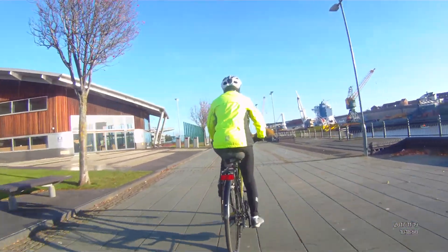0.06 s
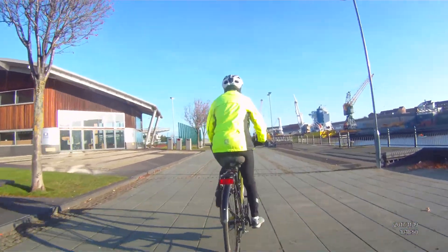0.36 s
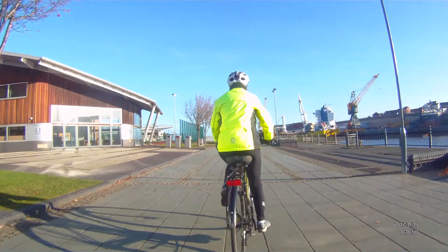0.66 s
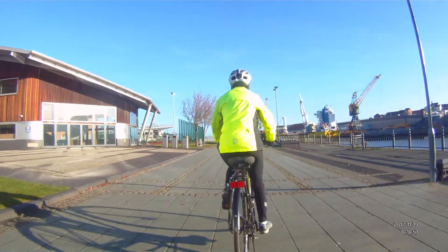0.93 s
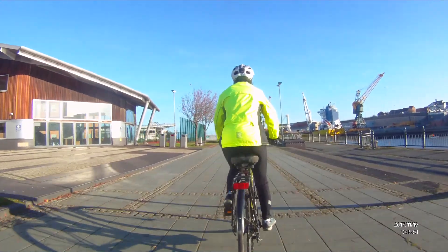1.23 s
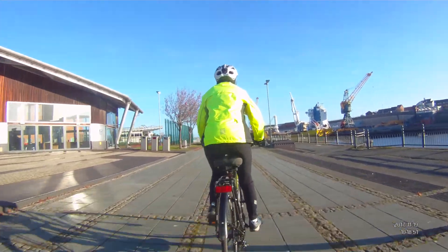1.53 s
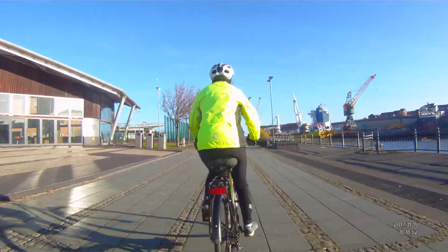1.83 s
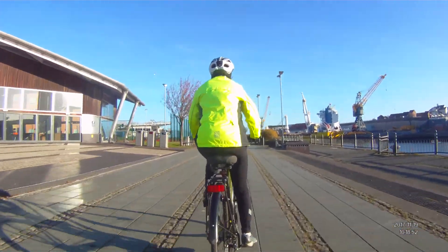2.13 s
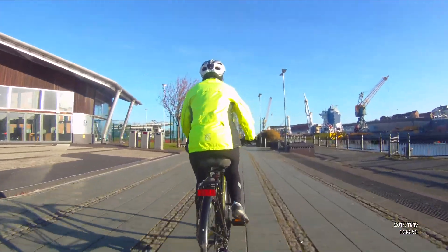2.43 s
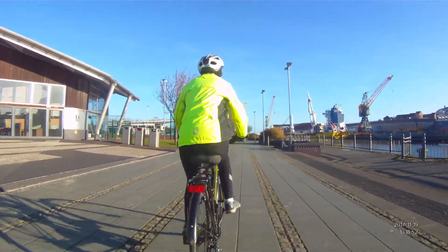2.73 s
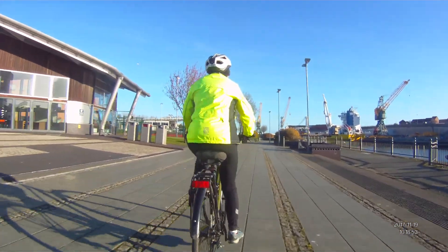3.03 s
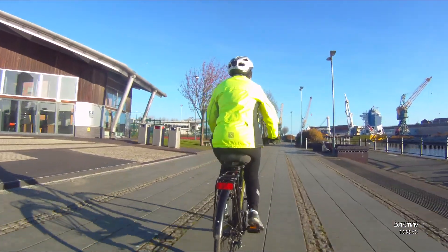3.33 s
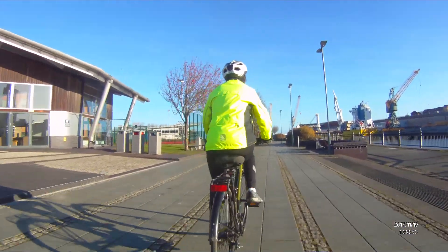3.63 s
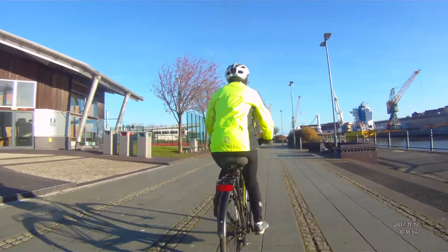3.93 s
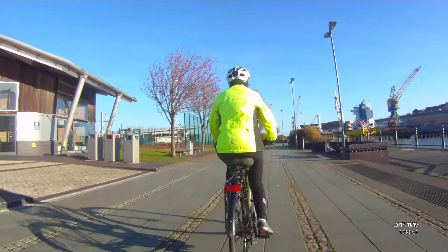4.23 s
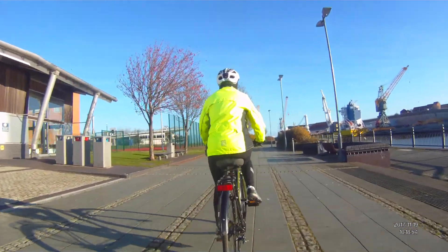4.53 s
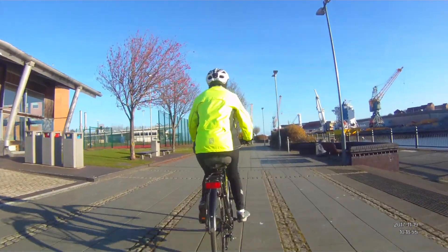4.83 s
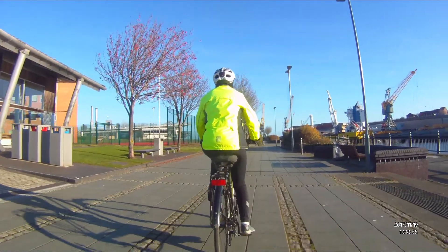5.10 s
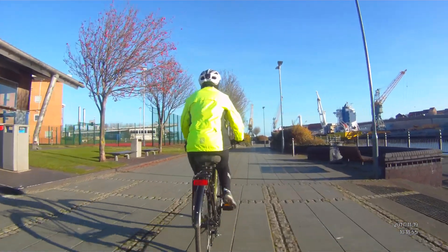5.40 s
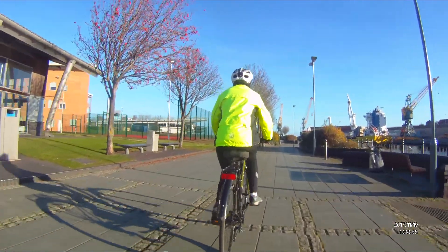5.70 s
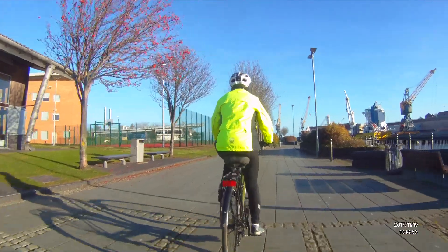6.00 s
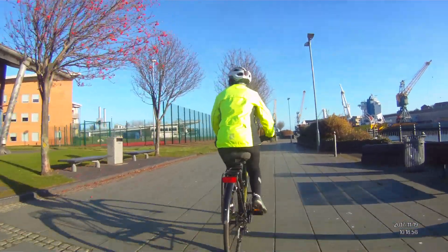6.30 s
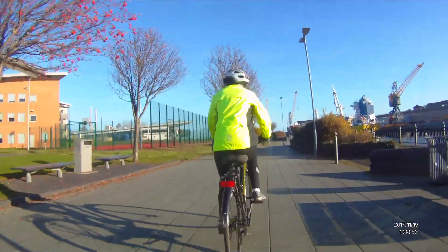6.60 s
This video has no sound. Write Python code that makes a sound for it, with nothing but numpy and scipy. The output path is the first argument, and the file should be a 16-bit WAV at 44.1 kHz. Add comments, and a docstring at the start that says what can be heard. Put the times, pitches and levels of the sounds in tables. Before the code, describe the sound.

Steady plastic rattling and small clicks from a bicycle rolling over paving, twice breaking into hard, loud clatter as it crosses cobbles.

```python
"""A camera mount chatters and knocks on a bicycle riding over paving slabs and two strips of cobbles.
The road shakes the mount, and every contact makes the camera's small plastic housing ring.
Underneath, the frame rumbles and the tyres drone; loose metal parts tinkle and the circuits faintly
hiss and whine. The hardest jolts overload the microphone."""
import sys
import numpy as np
from scipy import signal
from scipy.fft import rfft, irfft
from scipy.io import wavfile

SR = 44100
rng = np.random.default_rng(int(sys.argv[2]) if len(sys.argv) > 2 else 0)


def inscribe(sig):
    """Save sig as 16-bit PCM at rate SR to the path in sys.argv[1].

    A 1-D sig is mono; a 2-D sig holds one channel per row.
    Samples are clipped to [-1, 1] before scaling.
    """
    pcm = np.round(np.clip(np.atleast_2d(sig).T, -1, 1) * 32767)
    wavfile.write(sys.argv[1], SR, pcm.astype(np.int16))


N = 297715
TIME = np.arange(N) / SR
TAPS = 4096  # filter length in samples
FREQ = np.arange(TAPS // 2 + 1) * SR / TAPS + 1e-3

# the notes at which the plastic housing rings: (pitch [Hz], width [Hz], relative level [dB])
HOUSING_MODES = [(412, 112, -13.5), (710, 330, -16), (1230, 550, -10), (1561.6, 132, 1.5), (1890, 870, -9),
                 (2070, 256, -6), (2490, 213, -7), (2730, 1100, -15.5), (3420, 353, -9.5),
                 (3660, 120, -28.5), (4800, 410, -30.5)]


def mount_chatter(shake_db, ticks_per_s=75):
    """Tyre grain keeps six loose points of the mount ticking; stronger shake makes them brighter."""
    mode_db = np.array(HOUSING_MODES)[:, 2]
    flutter = undb(2.5 * wander(70))
    body = 0
    for _ in range(6):
        touches = rng.random(N) < ticks_per_s / SR
        strength = undb(1.5 * np.clip(rng.standard_normal(N), -2, 2))
        direction = np.sign(rng.standard_normal(N))
        ticks = unit(touches * direction * strength)
        contacts = (ticks + rng.standard_normal(N)) * flutter
        weights = undb(4 * rng.random(len(HOUSING_MODES)) - 12)
        weights *= undb(3 * (mode_db == mode_db.max()))  # steady rubbing feeds the strongest note most
        body = body + disperse(ring(contacts, housing(weights)), spread_s=.002)
    body = unit(body)
    treble = signal.sosfiltfilt(signal.butter(2, 2600, "high", fs=SR, output="sos"), body)
    hardness_db = .22 * (shake_db - np.median(shake_db)) - 8.3
    return (body + (undb(hardness_db) - 1) * treble) * undb(shake_db + 1.35)


def mount_knocks(force_db, bounce_s=.0115, bounce_loss_db=11):
    """Joints and stones knock the mount, which bounces once; rough ground adds force and cuts thud."""
    # the big knocks: (time [s], relative peak [dB], relative treble [dB], relative thud [dB])
    jolts = [(0.213, -14.5, -27, -25), (0.223, -10.5, -27, -36), (0.359, -10.5, -31, -26),
             (0.378, -12.5, -39, -31), (0.458, -10, -26.5, -24), (0.54, -9.5, -35.5, -25),
             (0.708, -16.5, -48, -17), (0.962, -19.5, -42, -20), (1.052, -6, -18, -27),
             (1.086, -16, -36.5, -36), (1.13, -8.5, -30, -36), (1.552, -9.5, -34.5, -25),
             (1.64, -13, -31, -33), (1.831, -8, -21, -23), (1.926, -8, -33, -35), (2.052, -16, -35, -31),
             (2.122, -8.5, -17, -19), (2.158, -3, -23, -22), (2.176, -1.5, -26, -26),
             (2.187, -3, -30, -23.5), (2.201, -2.5, -22.5, -23), (2.258, -11, -14, -36),
             (2.358, -8.5, -23, -23), (2.38, -3, -27, -25), (2.4, -7, -23, -17), (2.413, 1.5, -11, -30),
             (2.431, 3.5, -13, -28), (2.44, 7, -16, -22), (2.466, 1.5, -11, -18), (2.483, 0.5, -27, -24),
             (2.488, 2, -17, -23), (2.503, -4.5, -36, -26), (2.646, -5, -21.5, -33), (2.666, 1, -15, -15.5),
             (2.688, 6, -13, -28), (2.735, -10, -35, -38), (3.097, -18.5, -20.5, -22),
             (3.373, -12.5, -30, -31), (3.453, -11.5, -30, -24.5), (3.734, -12, -26, -38),
             (3.812, -13.5, -25, -29), (3.898, -16.5, -39, -31), (3.972, -10.5, -44, -21.5),
             (4.095, -15.5, -38, -32), (4.259, -20, -32, -16), (4.443, -18.5, -21, -23),
             (4.632, -18, -28, -25), (4.711, -13, -25, -26), (4.977, -14.5, -28.5, -23),
             (5.238, -16.5, -33, -19), (5.59, -17.5, -29, -17), (5.672, -16, -28, -31),
             (5.699, -15.5, -29, -33), (5.759, -18.5, -29, -21), (5.849, -10, -20, -34),
             (6.018, -11.5, -25, -22.5), (6.452, -10, -31, -25), (6.473, -5, -14, -40),
             (6.487, -6, -15, -20.5), (6.505, 3.5, -21.5, -27), (6.532, -2, -28.5, -24),
             (6.585, -8.5, -25, -26), (6.707, -4.5, -16, -20), (6.726, 0, -17, -20.5), (6.733, 2, -13, -27),
             (6.744, 3, -14, -24)]
    out = np.zeros(N)
    for s, peak_db, treble_db, low_db in jolts:
        extra_db = np.interp(s, TIME, force_db)
        level_db = peak_db + .5 + extra_db
        hardness_db = min(treble_db + 23.5 + extra_db / 2, 8)
        thud_db = low_db + 24 - extra_db
        add(out, s, knock(level_db, hardness_db, thud_db))
        lands_s = s + bounce_s * (1 + .1577 * either_way())
        add(out, lands_s, knock(level_db - bounce_loss_db, hardness_db, thud_db))
    return out


def mount_rattle(shake_db, rough_db, force_db, slab_per_s=8, cobble_per_s=85):
    """Smaller knocks come at random; stronger shake makes them more frequent, louder and harder."""
    out = np.zeros(N)
    per_s = slab_per_s + (cobble_per_s - slab_per_s) * rough_db / rough_db.max()
    count_so_far = np.cumsum(per_s) / SR
    for k in range(int(count_so_far[-1])):
        i = np.searchsorted(count_so_far, k + rng.random())
        level_db = shake_db[i] + 12 + force_db[i] + 5.5 * either_way()
        add(out, TIME[i], knock(level_db, hardness_db=-4 + .44 * rough_db[i], thud_db=-5))
    return out


def knock(level_db, hardness_db, thud_db, rise_s=.0009, buzz_s=.0062, firm_db=-14):
    """A jolt slaps the mount onto its stop and lets it buzz to rest in quick rebounds."""
    t = np.arange(TAPS) / SR
    # weak knocks do not seat the mount firmly, so it buzzes for longer
    length_s = buzz_s + .0003 * max(firm_db - level_db, 0)
    length_s *= np.exp(.34 * either_way())
    buzz = np.minimum(t / rise_s, 1) * np.exp(-(t / length_s) ** 1.5)
    push = .25 * rng.standard_normal(TAPS) * (rng.random(TAPS) < .15) * buzz
    push[int(rise_s * SR)] += 1  # the slap itself
    # each contact point favours different notes of the housing
    gain = housing(undb(2 * rng.standard_normal(len(HOUSING_MODES))))
    treble = 1 / (1 + (2600 / FREQ) ** 8) / (1 + (FREQ / 4500) ** 8)
    bass = 1 / (1 + (FREQ / 950) ** 6)
    hit = ring(disperse(push, spread_s=.0013), gain * undb(hardness_db * treble + thud_db * bass))
    attack_level = np.sqrt(np.mean(hit[:int(.008 * SR)] ** 2))
    return hit * undb(level_db - 11) / attack_level


def housing(weights):
    """How strongly the housing rings at each frequency; the plastic soaks up the highest treble."""
    # the tone of soft plastic contacts: (frequency [Hz], gain [dB])
    contact_tone = [(30, -23.5), (120, -2.5), (400, 0), (900, -1.5), (1500, 3), (2500, -0.5), (3100, -7),
                    (4000, -11.5), (4800, -19), (5500, -34.5), (8000, -15.5), (16000, -31.5)]
    return resonances(HOUSING_MODES, weights) * colour(contact_tone) / np.hypot(1, (FREQ / 5800) ** 4)


def disperse(x, spread_s):
    """Bending waves reach the microphone at different times for each frequency, softening each hit."""
    delay_s = spread_s * np.interp(FREQ / FREQ[-1], np.linspace(0, 1, 64), rng.random(64))
    smear = irfft(np.exp(-2j * np.pi * np.cumsum(delay_s) * SR / TAPS))
    lead = TAPS // 64
    return signal.oaconvolve(x, np.roll(smear, lead)[:TAPS // 2])[lead:lead + len(x)]


def road_shake(climb_s=.02, settle_s=.032):
    """How hard the road shakes the mount, in dB: the grain of the slabs plus swells on the cobbles."""
    # slab grain, one list before and one after the first cobbles: (time [s], shake [dB])
    slabs = [
        [(0.0, -35), (0.384, -32), (0.68, -36), (1.134, -34), (1.316, -37), (1.52, -36)],
        [(2.85, -36), (2.94, -36), (3.39, -37), (4.49, -36), (5.0, -38), (5.88, -34), (6.4, -36)],
    ]
    # a wheel runs over cobbles: (time [s], shake [dB], time on the stones [s])
    cobbles = [(1.58, -36, .22), (1.815, -28.5, .1), (2.125, -25.5, .115), (2.365, -25, 0.039),
               (2.42, -18, .08), (2.66, -21, .065), (6.48, -23, 0.079), (6.727, -14, .05)]
    power = undb(curve(np.concatenate(slabs))) ** 2
    for s, db, length_s in cobbles:
        # the shake builds as the tyre climbs the stones and dies away behind them
        fade = np.maximum(s - TIME, 0) / climb_s + np.maximum(TIME - s - length_s, 0) / settle_s
        power = power + (undb(db) * np.exp(-fade)) ** 2
    return 10 * np.log10(power)


def frame_rumble(bob_hz=50.7, wander_hz=4.5):
    """The frame and mount bob at their lowest natural note, pushed unevenly by the road."""
    # how strongly the frame sways: (time [s], relative level [dB])
    sway = [(0.0, -55), (0.58, -49.5), (0.75, -62), (1.11, -50), (1.77, -59), (1.82, -48), (2.69, -44),
            (3.01, -57.5), (3.87, -49), (4.0, -57.5), (4.4, -52), (5.71, -58.5), (6.07, -49), (6.35, -63),
            (6.5, -46), (6.75, -43)]
    level_db = curve(sway) + 2 * wander(12) + 1.5
    pitch_hz = bob_hz + wander_hz * wander(8.3)
    bob = unit(np.sin(2 * np.pi * np.cumsum(pitch_hz) / SR))
    shudder = noise(resonances([(55, 91, 0)]) ** 2)
    return unit(bob + .54 * shudder) * undb(level_db)


def tyre_drone(shake_db):
    """The rolling tyres drone through the frame, louder on rough ground."""
    # the notes at which the frame rings: (pitch [Hz], width [Hz], relative level [dB])
    frame_modes = [(103, 33, -6.5), (172.5, 17, -2.5), (259, 74, -8), (376, 68, -8), (691, 60, -4)]
    drone = noise(resonances(frame_modes) / np.hypot(1, (FREQ / 900) ** 3))
    level_db = -49 + .26 * (shake_db - np.median(shake_db)) + 2.5 * wander(25)
    return drone * undb(level_db)


def metal_tinks(ring_s=.02, rise_s=.001):
    """Each loose metal part rings briefly on one note, fading by 60 dB in ring_s."""
    # small loose parts on the bicycle: (time [s], pitch [Hz], relative level [dB])
    tinks = [(0.268, 2620, -18.5), (1.051, 4130, -26), (2.945, 3366, -33)]
    out = 0
    for s, hz, db in tinks:
        t = np.maximum(TIME - s, 0)
        envelope = (1 - np.exp(-t / rise_s)) * np.exp(-np.log(1000) * t / ring_s)
        out = out + undb(db) * envelope * np.sin(2 * np.pi * hz * t)
    return out


def electronics(hiss_db=-74, readout_hz=59.94):
    """Faint hiss, and thin whines from the camera's circuits that restart with each sensor readout."""
    # the microphone's own noise: (frequency [Hz], relative level [dB])
    hiss_tone = [(30, -14.5), (5000, 7.5), (7300, 3.5), (9000, 5), (15000, 2), (16000, -26)]
    # the whines of the circuits: (pitch [Hz], level [dB])
    whine_tones = [(4910, -83), (7880, -73), (10810, -92)]
    since_readout = TIME % (1 / readout_hz)
    whines = sum(undb(db) * unit(np.sin(2 * np.pi * hz * since_readout)) for hz, db in whine_tones)
    return noise(colour(hiss_tone)) * undb(hiss_db) + whines


def resonances(modes, weights=1):
    """Gain at each frequency of a body that rings at (pitch [Hz], width [Hz], level [dB]) notes."""
    hz, width, db = np.transpose(modes)
    detune = (FREQ[:, None] ** 2 - hz ** 2) / (FREQ[:, None] * width)
    return np.sqrt(np.sum((undb(db) * weights) ** 2 / (1 + detune ** 2), axis=1))


def colour(points):
    """Gain at each frequency, joining (frequency [Hz], level [dB]) points."""
    hz, db = np.transpose(points)
    return undb(np.interp(np.log(FREQ), np.log(hz), db))


def ring(x, gain):
    """Filter x by this gain so that the ringing follows each push and never comes before it."""
    cepstrum = irfft(np.log(gain + 1e-9))
    cepstrum[1:TAPS // 2] *= 2
    cepstrum[TAPS // 2 + 1:] = 0
    return signal.oaconvolve(x, irfft(np.exp(rfft(cepstrum))))[:len(x)]


def noise(gain):
    """Steady noise whose tone follows this gain at each frequency."""
    return unit(ring(rng.standard_normal(N), gain))


def wander(per_s):
    """Drift to a new random value per_s times a second."""
    return np.interp(TIME * per_s, np.arange(4096), rng.standard_normal(4096))


def either_way():
    """A random number between -1 and 1."""
    return rng.uniform(-1, 1)


def curve(rows):
    """Join (time [s], level [dB]) rows by straight lines."""
    return np.interp(TIME, *np.transpose(rows))


def undb(db):
    """Turn decibels into a gain."""
    return 10 ** (np.asarray(db) / 20)


def unit(x):
    """Scale to an average (rms) level of 1."""
    return x / np.sqrt(np.mean(x ** 2))


def add(out, s, sound):
    """Mix a sound in at time s."""
    start = int(np.clip(s * SR, 0, N))
    out[start:start + len(sound)] += sound[:N - start]


def scene():
    """Everything reaches the microphone through the camera body."""
    shake_db = road_shake()
    rough_db = np.maximum(shake_db - np.median(shake_db), 0)  # shake beyond that of plain slabs
    force_db = .16 * rough_db  # rough ground makes every knock stronger
    background = frame_rumble() + tyre_drone(shake_db) + metal_tinks() + electronics()
    mount = mount_chatter(shake_db) + mount_knocks(force_db) + mount_rattle(shake_db, rough_db, force_db)
    return (mount + background)[None]


def record(dry, ceiling=.84, top_hz=15400):
    """The converter clips loud peaks, folding harsh overtones back into the treble; the top is cut."""
    up, down = 320, 441  # it samples at 32 kHz
    clipped = np.clip(signal.resample_poly(dry, up, down, axis=1), -ceiling, ceiling)
    sound = signal.resample_poly(clipped, down, up, axis=1)[:, :N]
    return signal.sosfilt(signal.ellip(8, .2, 70, top_hz, fs=SR, output="sos"), sound)


dry = scene()
out = record(dry)
inscribe(out)
```